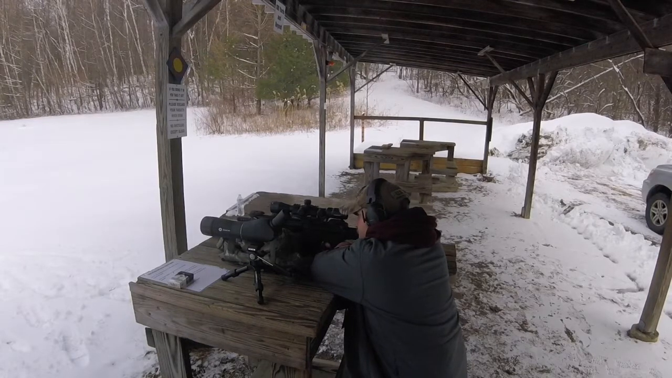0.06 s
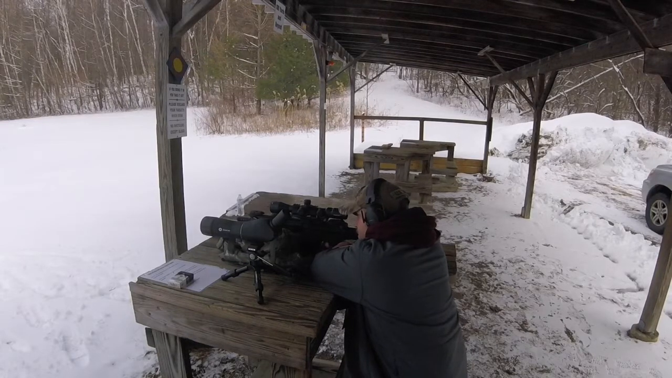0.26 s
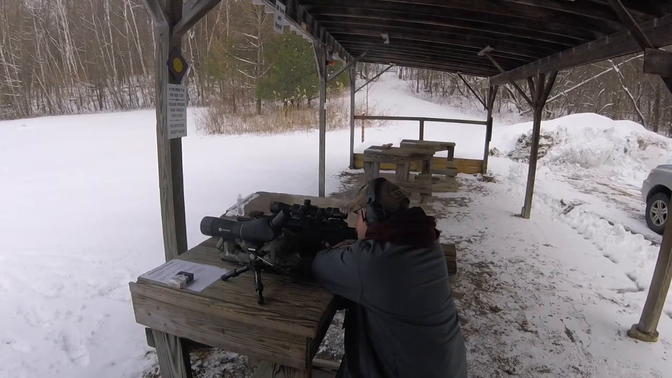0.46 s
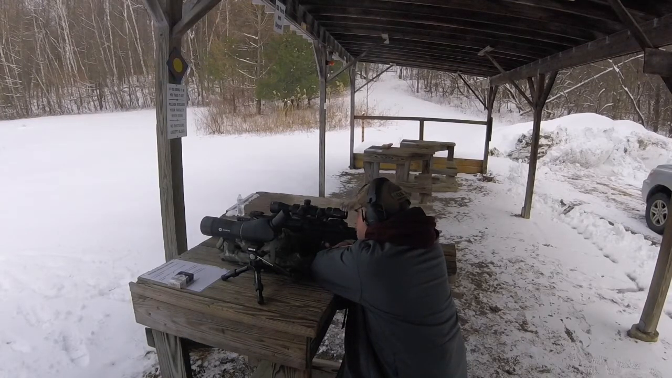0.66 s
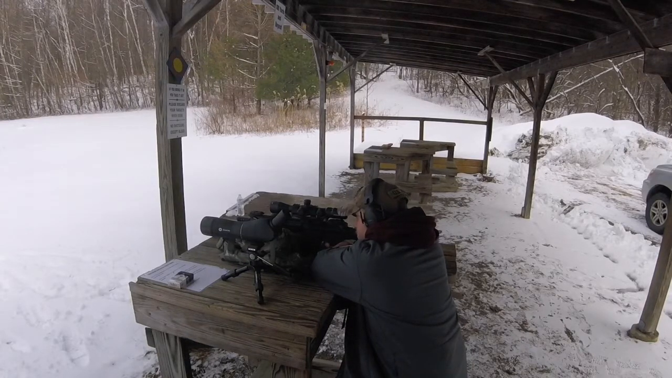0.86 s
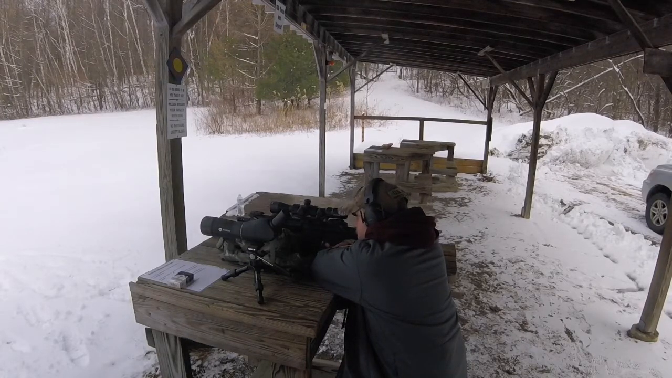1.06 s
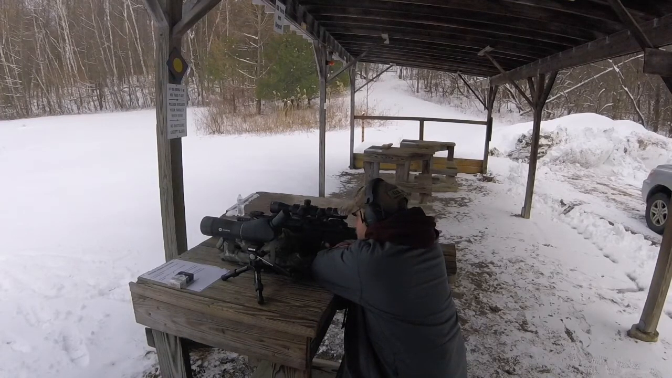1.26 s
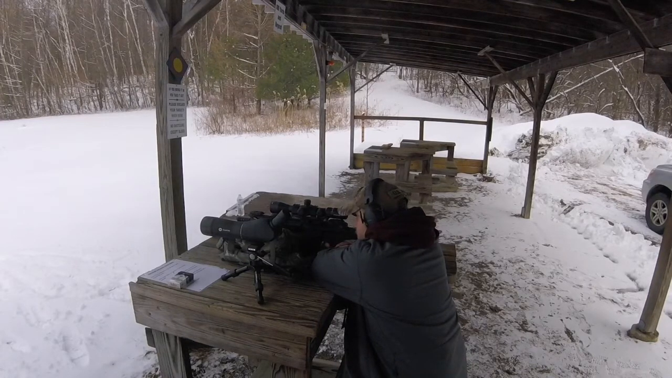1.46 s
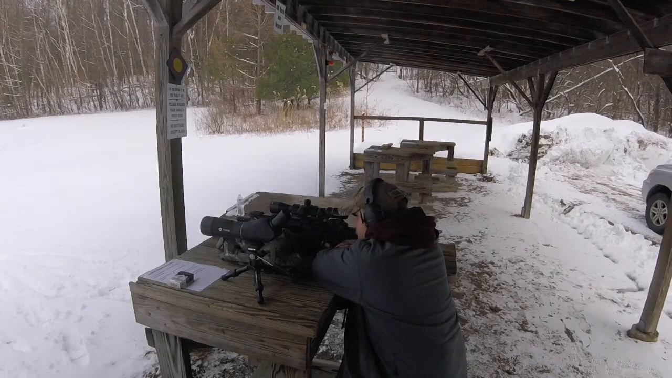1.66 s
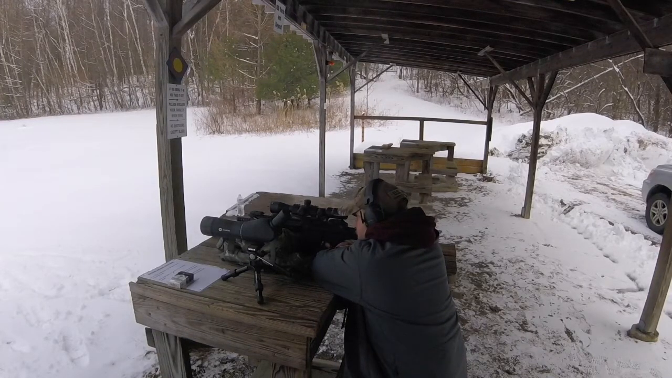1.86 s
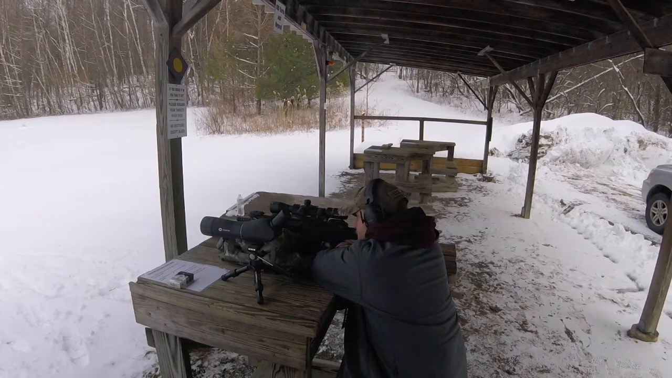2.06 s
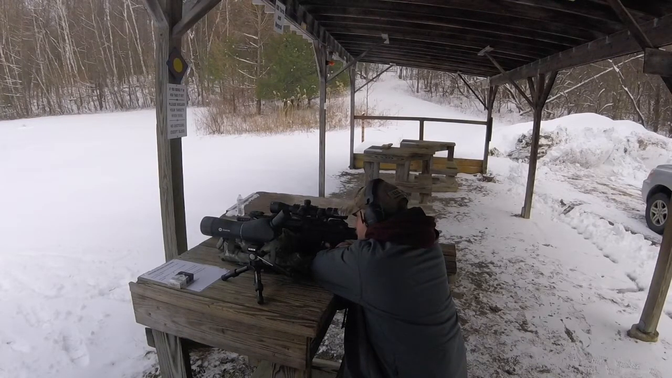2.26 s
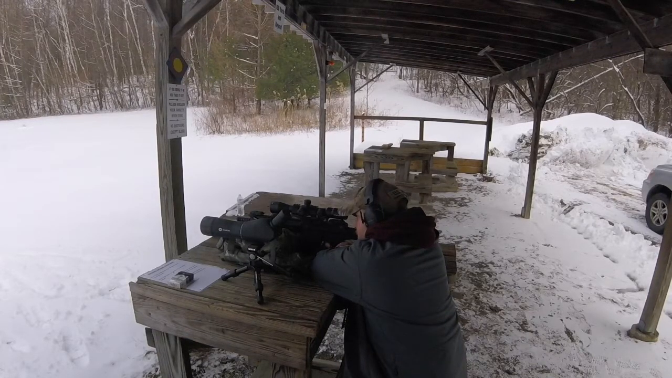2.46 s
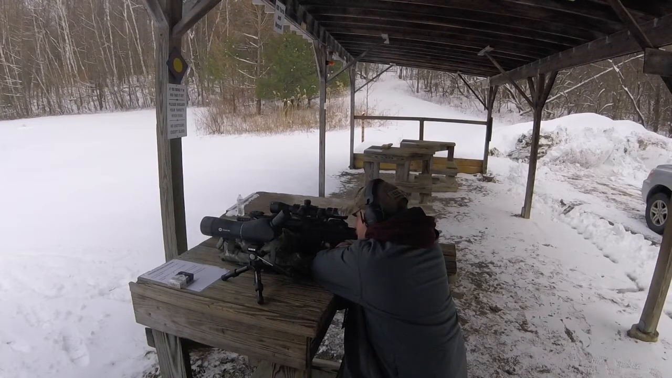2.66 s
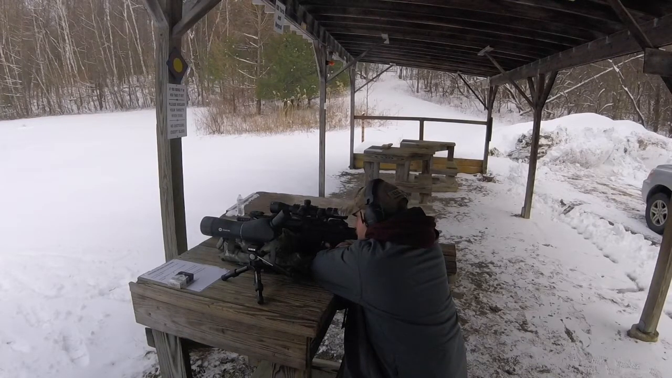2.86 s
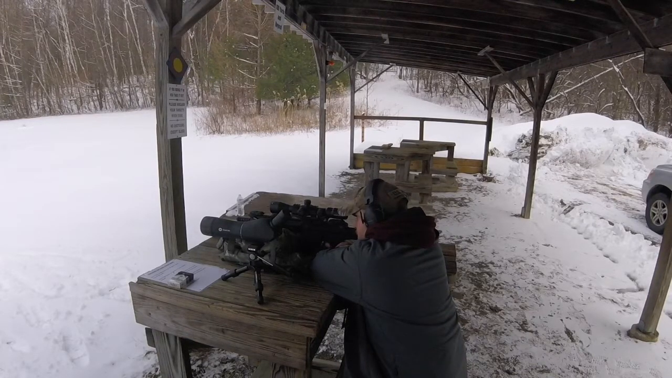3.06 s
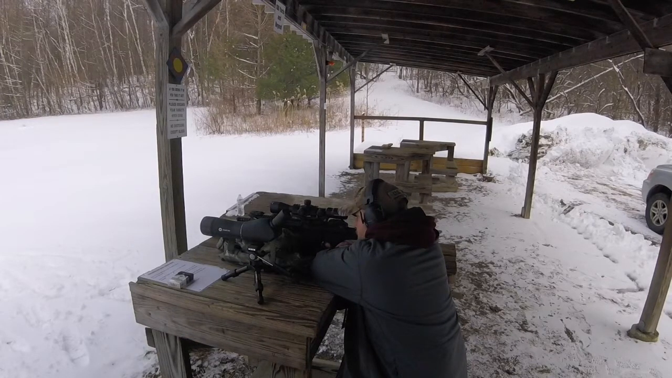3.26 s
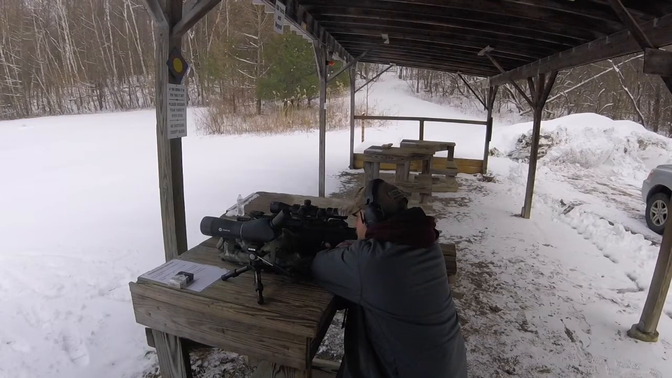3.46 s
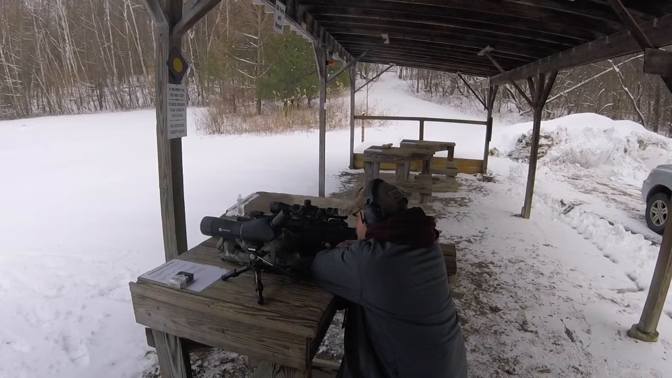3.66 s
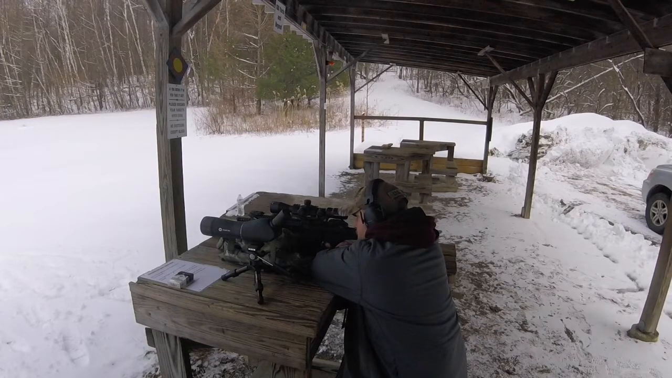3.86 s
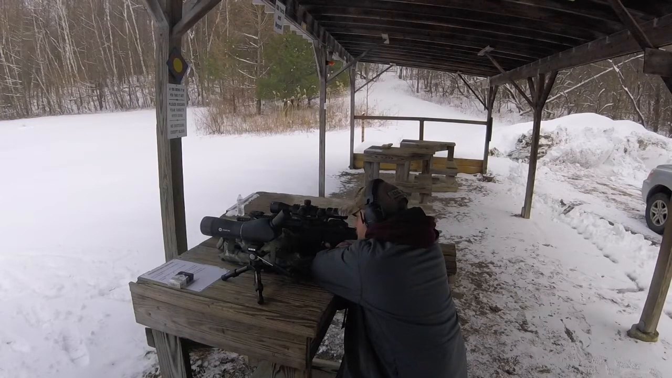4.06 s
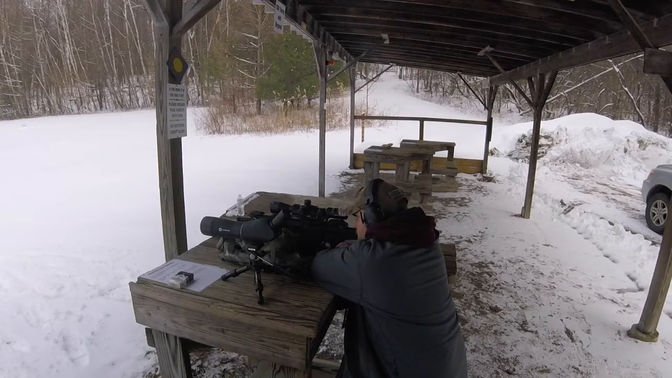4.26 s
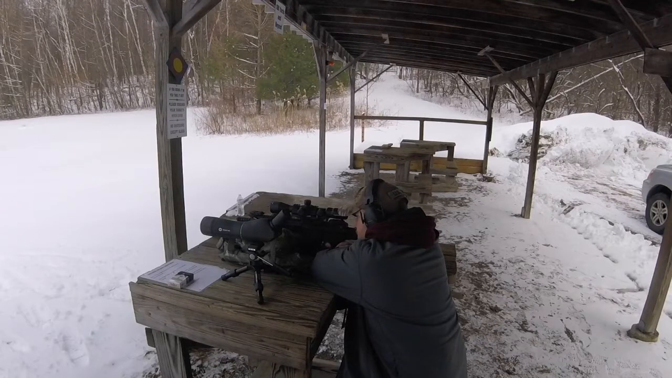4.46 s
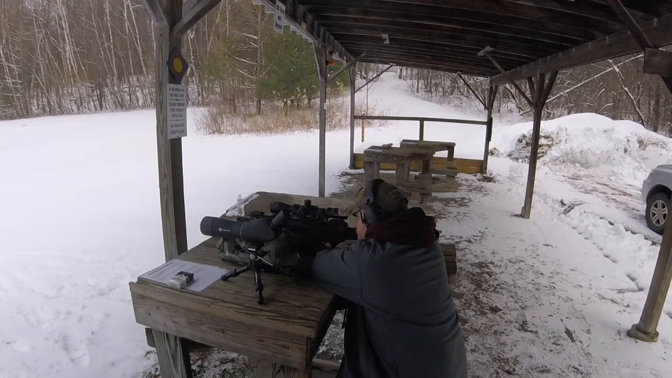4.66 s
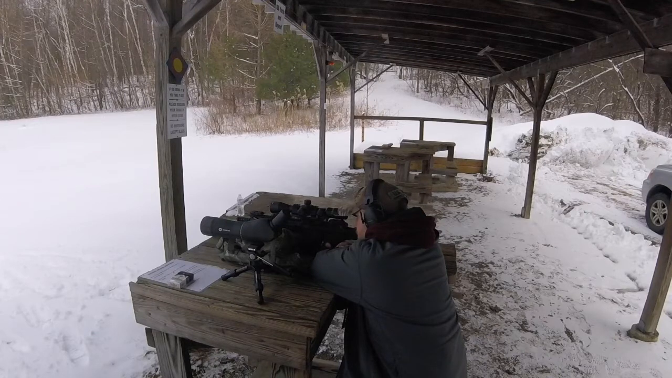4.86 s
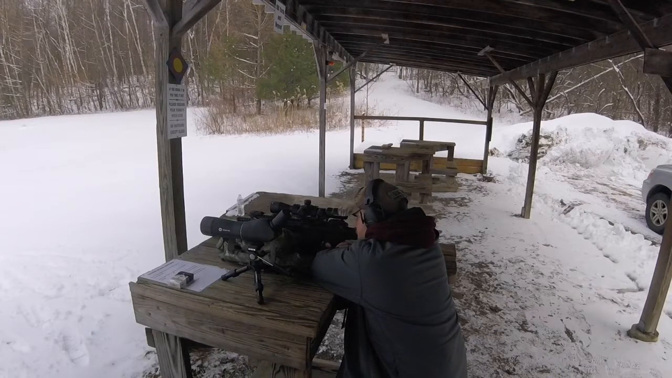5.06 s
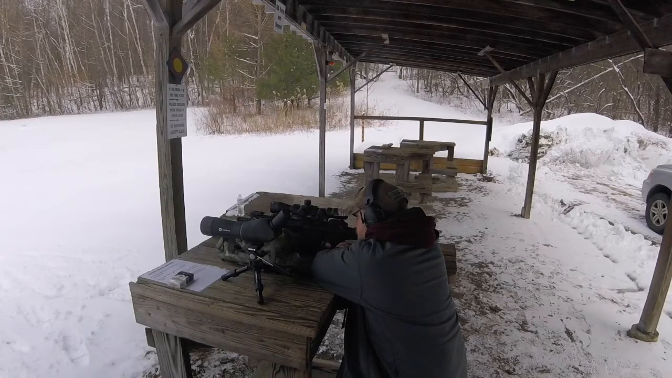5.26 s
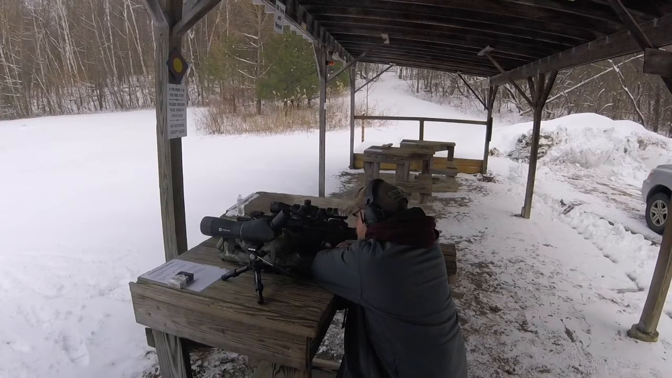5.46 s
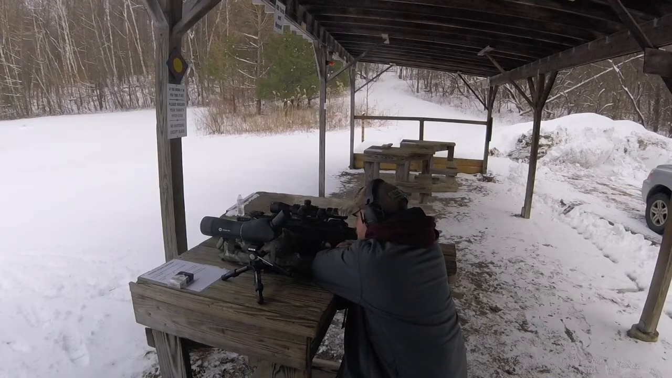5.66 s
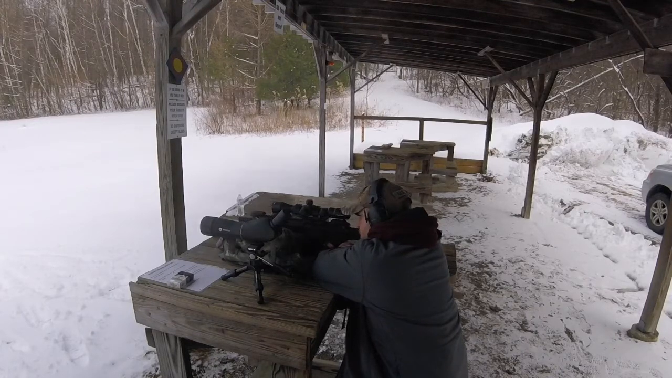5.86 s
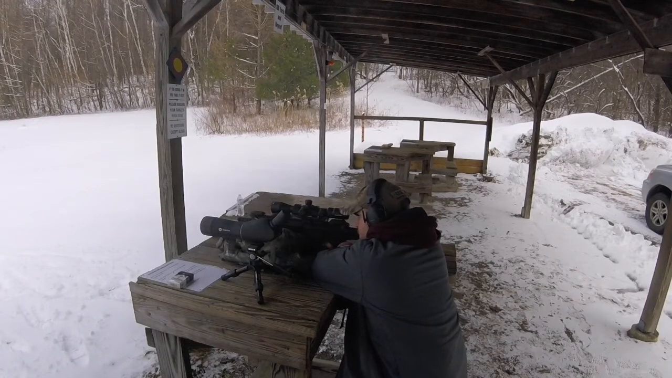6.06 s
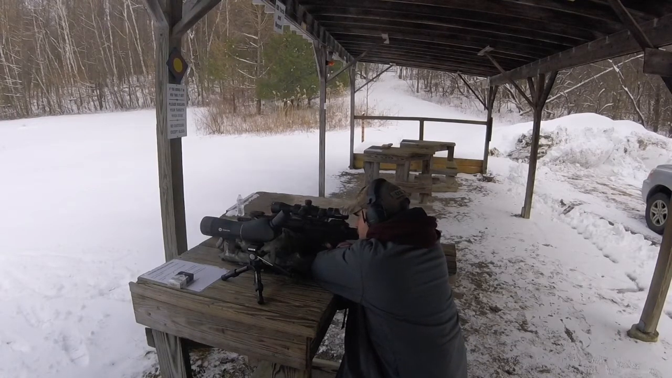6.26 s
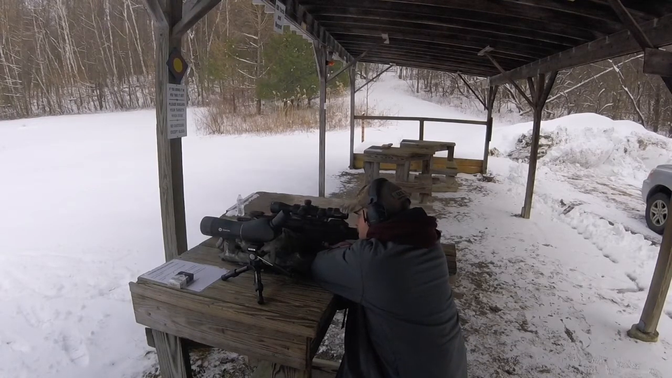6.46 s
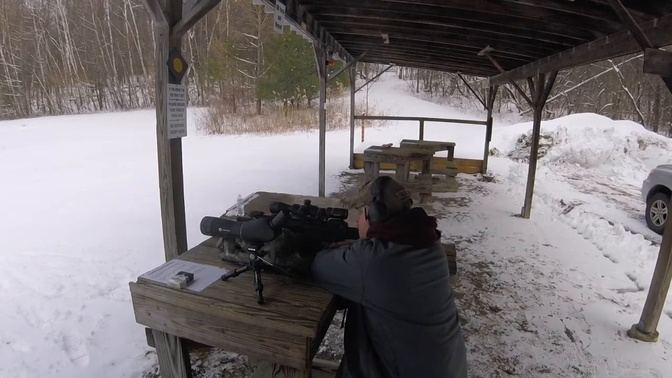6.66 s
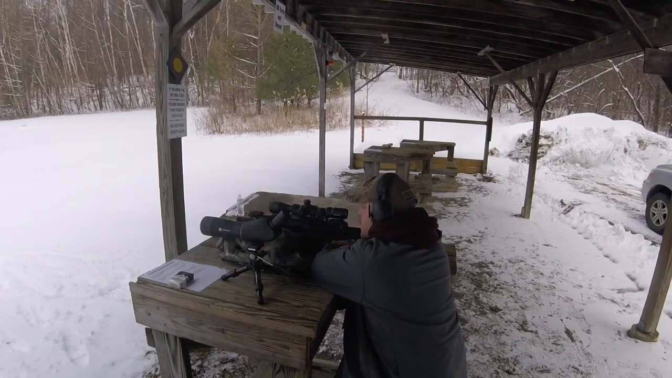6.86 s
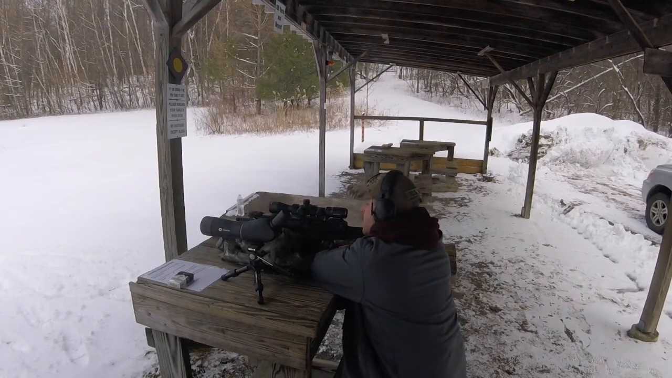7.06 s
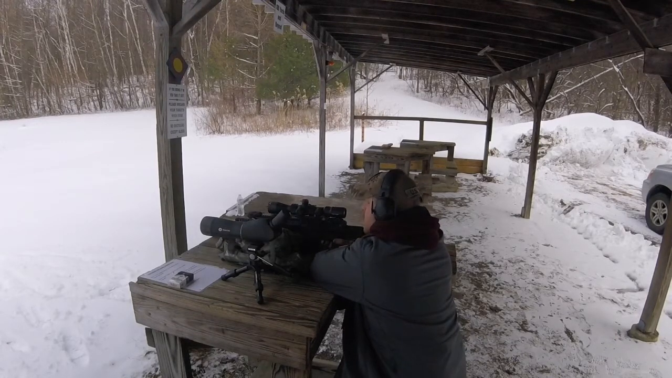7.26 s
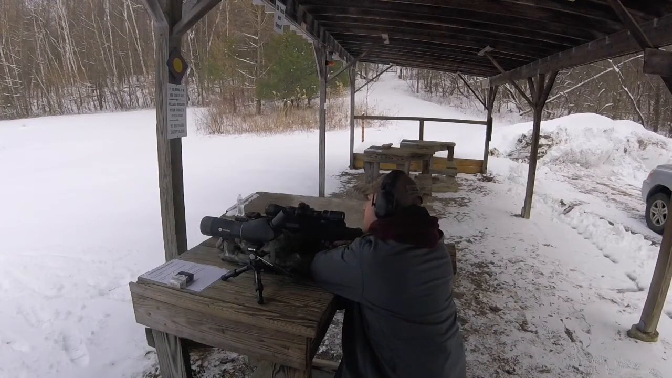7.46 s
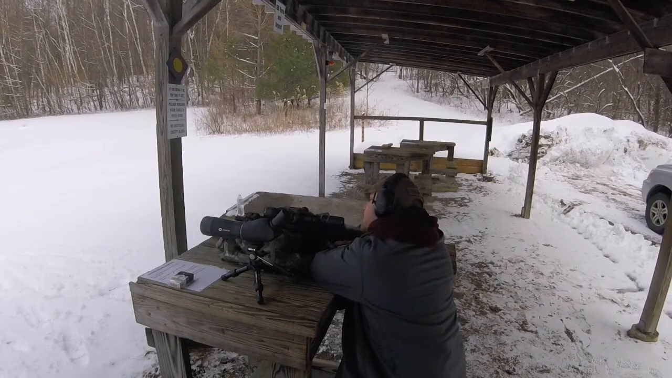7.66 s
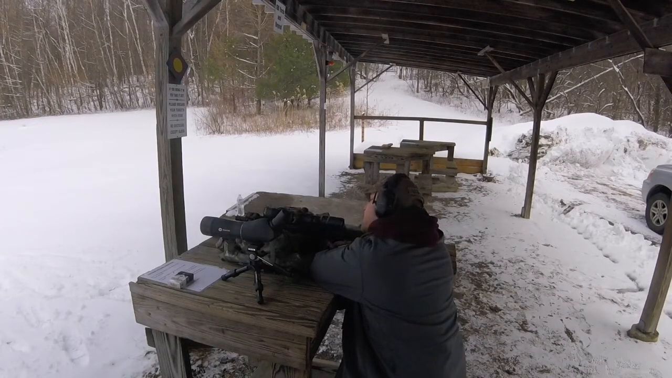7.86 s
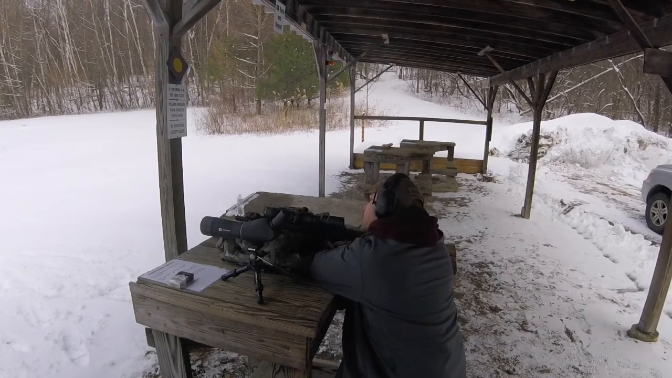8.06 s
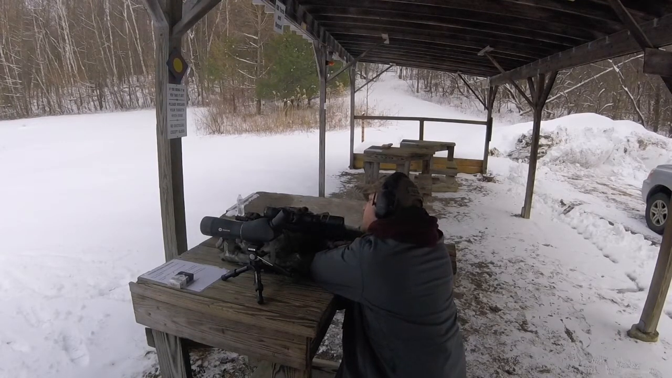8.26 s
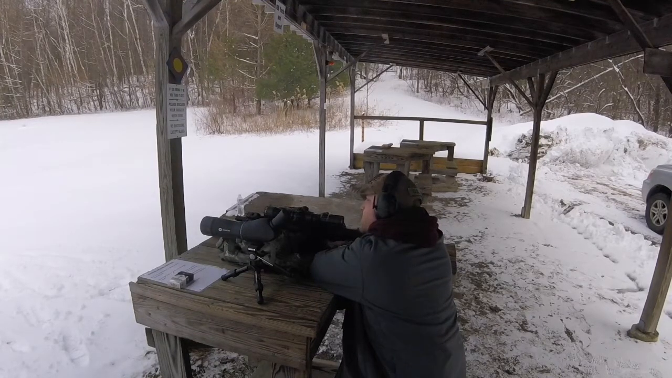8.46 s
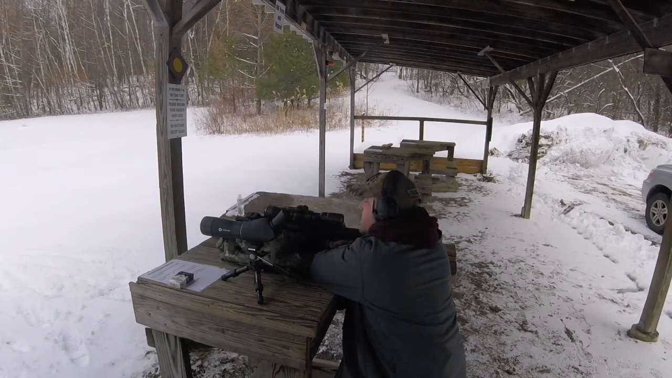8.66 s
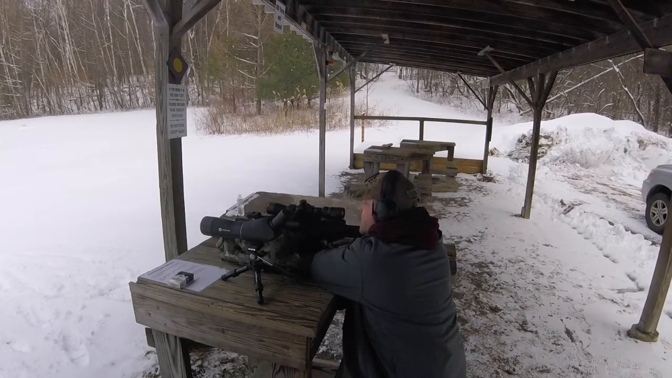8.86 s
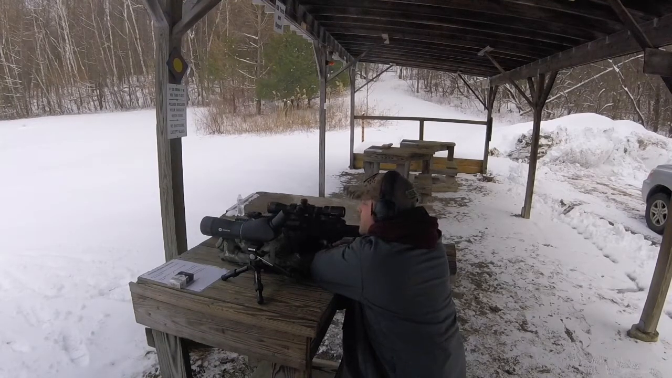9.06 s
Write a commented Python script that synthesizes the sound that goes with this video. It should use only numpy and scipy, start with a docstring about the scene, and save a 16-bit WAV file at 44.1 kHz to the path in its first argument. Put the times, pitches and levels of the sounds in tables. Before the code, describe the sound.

The sound opens on the tail of a gunshot, its echo rolling through wooded hills and fading over about three seconds. A small bullet smack comes at 0.2 seconds, and a brass case rings lightly at 0.4 and 0.7. Faint meltwater drips tick throughout over soft hiss, with a few brief jacket rustles. From about 2.6 seconds a faint distant motor hums, slowly sinking in pitch. At 5.7 seconds one very loud, close gunshot cracks and booms under a wooden roof, overloading the microphone so that everything dips in level and creeps back. The spent case knocks and bounces between 5.9 and 6.3 seconds, and the bullet smacks the target at about 6.1. The echo swells and rolls away through the trees, with a few sharper returns. From 8.6 to 9 seconds cloth rustles and the gun gives several quiet metallic clicks.

```python
"""A rifle-calibre pistol has just been fired under the wooden roof of a snowy range, close to a camera.
The bullet smacks the target, the echo rolls through wooded hills and a spent case knocks and rings.
Melt water drips, a jacket rustles and a distant motor hums, sinking in pitch. At 5.7 s a second blast
overloads the recorder, whose gain dives and creeps back while hit, case and echo follow again.
Near the end the gun clicks as it is handled."""
import sys
import numpy as np
from scipy import signal
from scipy.io import wavfile
from scipy.ndimage import uniform_filter1d, minimum_filter1d

SR = 44100
rng = np.random.default_rng(int(sys.argv[2]) if len(sys.argv) > 2 else 0)


def unload_wav(signal):
    """Save mono or channel-first audio to the path in sys.argv[1] as 16-bit WAV at rate SR, clipped to [-1, 1]."""
    wavfile.write(
        sys.argv[1],
        SR,
        np.round(np.clip(np.atleast_2d(signal).T, -1, 1) * 32767).astype(np.int16),
    )


N = 402191

# when the gun fires, first just before the scene opens: (time [s])
SHOT_TIMES = [-0.2847, 5.698]
def shots():
    """Gun and hills stay put, so both shots have the very same blast and echo."""
    report, out = woods(), np.zeros(N)
    add(report, 0, blast())
    for s in SHOT_TIMES:
        add(out, s, report)
    return out


# the blast and its bounces off bench, roof and posts:
# (delay [s], push level [dB], push length [s], crack level [dB])
BLAST_PATHS = [(0, 26.5, 0.0045, 24), (.0054, -4, 0.0003, 14), (.009, 17, 0.00097, 8),
               (0.014, 21.5, .002, 8), (0.0225, 16.5, 0.0027, -6)]
# tone of the shock wave's crack: (frequency [Hz], level [dB])
CRACK_TONE = [(300, -13), (1500, -7), (2800, 12), (4000, -14), (5800, 22), (7000, 12), (9500, -8),
              (13000, -12)]
# tone of the shelter's clatter: (frequency [Hz], level [dB])
CLATTER_TONE = [(30, 11), (90, 24), (170, 26), (300, 29.5), (500, 32), (720, 31), (1200, 26), (2200, 20.5),
                (3100, 18), (3900, 10.5), (5300, 18.5), (6600, 16.5), (9000, 2), (12000, 3)]
# the roof's short thud: (pitch [Hz], level [dB], time to fade 60 dB [s])
ROOF_THUD = [(174.5, 6, 0.13), (231, -6, 0.2)]
# the shelter's deep notes: (pitch [Hz], level [dB], time to fade 60 dB [s], rise time [s])
SHELTER_BOOM = [(105, 6.5, 0.84, 0.16), (114, 3, 0.69, 0.12)]
def blast(fast_fade_s=0.15, slow_fade_s=1.0, slow_db=-19, push_lag_s=.0009):
    """Shock waves crack, then push and suck; posts and rafters scatter them, and the shelter booms."""
    t = seconds(1.5)
    out = np.zeros(len(t))
    for delay, push_db, push_s, crack_db in BLAST_PATHS:
        add(out, delay, gain_of(crack_db) * colour(puff(decay_s=0.00037), CRACK_TONE))
        add(out, delay + push_lag_s, gain_of(push_db) * (1 - t / push_s) * np.exp(-t / push_s))

    def lingering_db(s, hz):
        rumble_db = bump(hz, centre_hz=135, half_width_hz=95, height_db=11)
        fade_db_per_s = 60 / slow_fade_s + 9 * hz / 1000  # high sounds die sooner
        return slow_db + rumble_db - s * fade_db_per_s
    fast = rng.standard_normal(len(t)) * gain_of(-60 * t / fast_fade_s)
    slow = noise(1.5, lingering_db, size=2048)
    out += colour(fast + slow, CLATTER_TONE)
    for hz, db, fade_s in ROOF_THUD:
        out += fading_note(t, hz, db, fade_s)
    for hz, db, fade_s, rise_s in SHELTER_BOOM:
        out += fading_note(t, hz, db, fade_s) * (1 - np.exp(-t / rise_s))
    return out


# tone of what the trunks throw back over the snow: (frequency [Hz], level [dB])
WOODS_TONE = [(40, -26), (170, -37.5), (240, -19.5), (340, -5.5), (480, 1), (640, 2), (1000, -4),
              (1500, -3.5), (2300, -5), (3100, -8.5), (3900, -15.5), (5500, -1.5), (6600, -12.5),
              (11000, -21.5)]
# single sharp echoes from the slopes: (delay [s], spike above the rolling echo [dB])
SLOPE_ECHOES = [(1.024, 23.5), (1.206, 26.5), (2.199, 20.5), (3.178, 30)]
def woods(air_db_per_s=5, carry_db_per_s=3, carry_hz=345):
    """Countless trunks return the shot; the longer the path, the more treble the air has taken."""
    def level_db(t, hz):
        air_loss_db = air_db_per_s * t * (hz / 1000) ** 1.126
        # low sounds bend round the hills and carry farther
        carry_db = carry_db_per_s * np.minimum(t, 3) / (1 + (hz / carry_hz) ** 4)
        return roll_db(t) + read(WOODS_TONE, hz) - air_loss_db + carry_db
    echo = noise(6.5, level_db, size=1024, spikes=SLOPE_ECHOES)
    t = np.arange(len(echo)) / SR
    small_clumps_db = 0.78 * wander(t, per_s=90)
    large_groves_db = 0.98 * wander(t, per_s=15)
    return echo * gain_of(small_clumps_db + large_groves_db)


# swells sent back by wooded hillsides: (delay [s], half width [s], boost [dB])
HILL_SWELLS = [(.56, .05, 3), (1.33, 0.15, 4), (1.73, 0.23, 2.5), (3.1, 0.25, 3.5), (3.53, 0.17, 4)]
def roll_db(t, field_db=-23, field_s=0.079, trees_db=4.5, trees_s=0.32, fade_db_per_s=8):
    """The echo is faint over open snow, grows as the tree line answers, then fades with a few swells."""
    short_of_trees = np.clip((trees_s - t) / (trees_s - field_s), 0, 1)
    rise_db = (field_db - trees_db) * short_of_trees ** 1.34
    fade_db = fade_db_per_s * np.maximum(t - trees_s, 0)
    hills_db = sum(db * np.exp(-((t - delay) / width) ** 2) for delay, width, db in HILL_SWELLS)
    return trees_db + rise_db - fade_db + hills_db


# bullets reaching the target: (time [s], level [dB])
BULLET_HITS = [(0.164, -22), (6.145, -20)]
# tone of a wet smack, also used for the drips: (frequency [Hz], level [dB])
SMACK_TONE = [(300, -9), (1500, 14), (2500, 19), (5000, 14.5), (6800, 8.5), (8500, -14), (12000, -25)]
def bullet_hits():
    """Each bullet stops in the target with a short smack."""
    out = np.zeros(N)
    for s, db in BULLET_HITS:
        add(out, s, gain_of(db) * evened(colour(puff(decay_s=0.011), SMACK_TONE)))
    return out


# spent cases landing, before overall_db is added:
# (time [s], knock level [dB], knock pitch [Hz], ring level [dB])
CASE_LANDINGS = [(.372, -42, 6370, -50), (.405, -54, 8300, -32.5), (.675, -47, 8750, -39),
                 (5.88, -23, 5270, -60), (6.048, -19.5, 5800, -49), (6.324, -35, 8700, -38)]
# the notes of a brass case: (pitch [Hz], relative level [dB], time to fade 60 dB [s])
CASE_NOTES = [(8400, -1, 0.22), (8250, -7, .15), (12450, -38, .15)]
def cases(overall_db=-8):
    """Brass cases knock on bench and ground and ring briefly."""
    out, t = np.zeros(N), seconds(.4)
    ring = sum(fading_note(t, hz, db, fade_s) for hz, db, fade_s in CASE_NOTES)
    for s, knock_db, hz, ring_db in CASE_LANDINGS:
        add(out, s, gain_of(knock_db) * tick(hz, width_hz=1700, decay_s=0.0016))
        add(out, s, gain_of(ring_db) * ring)
    return gain_of(overall_db) * out


# clicks of the gun: (time [s], level [dB], decay [s], ring compared with clack [dB])
GUN_CLICKS = [(8.681, -55, .004, -6), (8.691, -50.5, 0.0015, -15), (8.7103, -40, 0.0023, -2.5),
              (8.726, -50, .004, -10), (8.751, -61, .004, 9), (8.869, -50.5, 0.0019, -3),
              (8.878, -60, .003, -12), (8.997, -48.5, 0.0023, -1)]
# tone of the gun's body: (frequency [Hz], level [dB])
CLACK_TONE = [(300, -24), (900, 2), (1600, -0.5), (3200, -1), (5000, -10), (7500, -7), (12000, -18)]
def gun_handling(ring_hz=5800):
    """The gun's body clacks dryly, with a short bright ring of steel."""
    out = np.zeros(N)
    for s, db, decay_s, ring_db in GUN_CLICKS:
        clack = evened(colour(puff(decay_s), CLACK_TONE))
        ring = gain_of(ring_db) * tick(ring_hz, width_hz=940, decay_s=decay_s)
        add(out, s, gain_of(db) * (clack + ring))
    return out


# the nearest drops: (time [s], level [dB], pitch [Hz], slap compared with tick [dB])
NEAR_DRIPS = [(1.172, -51, 6550, -18), (1.638, -53, 5460, -20), (1.675, -48.5, 5250, -26),
              (2.118, -55, 6290, -20), (2.2355, -48, 5700, -29), (2.369, -52.5, 6100, -5),
              (2.411, -52, 5650, -22), (2.509, -50.5, 6040, -13), (2.751, -51, 5670, -3.5),
              (2.865, -52, 6550, -16), (3.179, -48, 5840, -11), (3.41, -52.5, 5950, -6.5),
              (3.908, -56, 6340, -22), (4.32, -55, 6000, -7), (4.36, -52, 6340, -6),
              (4.509, -52.5, 6240, -9), (4.636, -48.5, 5470, -15), (4.789, -51, 6030, -7),
              (4.894, -53, 5800, 2.5), (5.349, -56, 6260, -13), (5.583, -51, 6400, -11),
              (5.603, -46, 5930, -15), (6.823, -50.5, 6240, -20), (7.011, -51.5, 5600, -20),
              (7.422, -54, 5200, -23), (7.6, -49, 6160, -10), (7.852, -52, 5650, -3.5),
              (7.887, -49, 6100, -16), (8.106, -59.5, 7110, 4.5), (8.342, -53, 5500, -10),
              (8.401, -47.5, 6260, -23)]
def drips(far_per_s=7, far_db=-60.5, spread_db=7, far_hz=5970, spread_hz=2400):
    """Melt water falls from the roof's edge: some drops close by, fainter ones at random farther off."""
    out = np.zeros(N)
    for s, db, hz, slap_db in NEAR_DRIPS:
        add(out, s, gain_of(db) * drip(hz, slap_db))
    for k, (when, distance, pitch) in enumerate(rng.random(size=(200, 3))):
        s = (k + 2 * when) / far_per_s
        if s < N / SR:
            far_drop = drip(far_hz + spread_hz * (pitch - .5), slap_db=-13)
            add(out, s, gain_of(far_db - spread_db * distance) * far_drop)
    return out


def drip(hz, slap_db, spatter_db=-7, droplets_per_s=500):
    """One drop lands with a bright tick, a duller slap and a spatter of droplets."""
    slap = evened(colour(puff(decay_s=0.0004), SMACK_TONE))
    spray = puff(decay_s=0.015)
    droplets = spray * (rng.random(len(spray)) < droplets_per_s / SR)
    spatter = gain_of(spatter_db) * evened(colour(droplets, SMACK_TONE))
    return tick(hz, width_hz=2000, decay_s=0.0024) + gain_of(slap_db) * (slap + spatter)


# the shooter's jacket moving: (time [s], length [s], level [dB])
RUSTLES = [(2.299, 0.1, -50), (2.743, 0.063, -48), (5.289, 0.078, -48.5), (7.409, 0.2, -46),
           (7.8, 0.082, -56), (8.285, 0.11, -56), (8.64, 0.34, -48.5)]
# tone of the cloth: (frequency [Hz], level [dB])
CLOTH_TONE = [(500, -17), (2500, -4), (3900, -11), (5300, -2.5), (6600, 0), (9000, -17), (12000, -17)]
def jacket(creases_per_s=1800):
    """Stiff cloth gives way in a swell of tiny creases."""
    out = np.zeros(N)
    for s, length, db in RUSTLES:
        size, chance = rng.standard_normal(SR // 2), rng.random(SR // 2)
        creases = (size * (chance < creases_per_s / SR))[:int(length * SR)]
        add(out, s, gain_of(db) * evened(colour(creases, CLOTH_TONE)) * np.hanning(len(creases)))
    return out


# quick bounces off the roof: (delay [s], strength [share of the direct sound])
ROOF_BOUNCES = [(.0062, 0.51), (.0078, 0.065), (.0098, 0.28), (0.0112, .18), (0.016, 0.086)]
def shelter_echo(x, fade_s=0.21, tail_db=-5):
    """Small sounds come back from the roof, then die away among the benches."""
    t = seconds(.3)
    after_first_bounce = t > ROOF_BOUNCES[0][0]
    tail = rng.standard_normal(len(t)) * gain_of(-60 * t / fade_s) * after_first_bounce
    response = gain_of(tail_db) * tail / np.linalg.norm(tail)
    response[0] = 1  # the direct sound
    for delay, strength in ROOF_BOUNCES:
        response[round(delay * SR)] += strength
    return signal.oaconvolve(x, response)[:N]


# the course of the motor's hum: (time [s], pitch [Hz], level [dB])
MOTOR_HUM = [(2.6, 293.6, -56), (3.5, 275.4, -55.5), (4.2, 265, -52), (4.6, 256.3, -50.5), (5, 250.4, -51),
             (5.599, 234, -49), (6.5, 222, -71)]
def motor(waver=0.0036):
    """A distant motor hums one wavering note that slowly sinks."""
    s, hz, db = np.transpose(MOTOR_HUM)
    t = np.arange(N) / SR
    drift = evened(uniform_filter1d(rng.standard_normal(N), size=3000))
    cycles = np.cumsum(np.interp(t, s, hz) * (1 + waver * drift)) / SR
    loudness = gain_of(np.interp(t, s, db, left=-120, right=-120))
    return loudness * np.sqrt(2) * np.sin(2 * np.pi * cycles)


# tone of still air and microphone hiss: (frequency [Hz], level [dB])
HISS_TONE = [(20, -24), (110, -26), (170, -30.5), (340, -33.5), (700, -38), (1500, -41), (3000, -46.5),
             (4400, -55), (5500, -48.5), (8000, -44.5), (9600, -49.5), (10600, -55.5), (12000, -51.5),
             (13200, -58)]
def background(top_hz=13300):
    """Air rumbles and the microphone hisses; its small opening rings at one high pitch."""
    def level_db(t, hz):
        opening_db = bump(hz, centre_hz=6520, half_width_hz=240, height_db=11.5)
        return read(HISS_TONE, hz) + opening_db - .025 * np.maximum(hz - top_hz, 0)
    return noise(N / SR + 1, level_db, size=2048)[:N]


def camera_housing(x, cutoff_hz=9700):
    """The camera's housing shuts out the highest sounds."""
    return signal.sosfilt(signal.butter(9, cutoff_hz, fs=SR, output="sos"), x)


def gain_of(db):
    """Turns decibels into a number to multiply by."""
    return 10 ** (np.asarray(db) / 20)


def evened(x):
    """Scales a sound to an average power of 1."""
    return x / np.sqrt(np.mean(x ** 2) + 1e-20)


def read(tone, hz):
    """Looks up a tone table's level, gliding between its rows."""
    row_hz, db = np.transpose(tone)
    return np.interp(np.log(hz + 1), np.log(row_hz), db)


def bump(hz, centre_hz, half_width_hz, height_db):
    """A rounded boost around one frequency."""
    return height_db / (1 + ((hz - centre_hz) / half_width_hz) ** 2)


def add(mix, s, sound):
    """Mixes a sound in at time s, which may lie before the start."""
    at = round(s * SR)
    sound = sound[max(-at, 0):]
    part = mix[max(at, 0):][:len(sound)]
    part += sound[:len(part)]


def seconds(length):
    """The time of each sample."""
    return np.arange(int(length * SR)) / SR


def fading_note(t, hz, db, fade_s):
    """A pure note that drops 60 dB in fade_s seconds."""
    return gain_of(db - 60 * t / fade_s) * np.sin(2 * np.pi * hz * t)


def noise(length, level_db, size, spikes=()):
    """Noise, with any spikes (time [s], level [dB]), shaped by the rule level_db(time, frequency)."""
    white = rng.standard_normal(int(length * SR))
    for s, db in spikes:
        white[round(s * SR)] += gain_of(db)
    frames = dict(fs=SR, nperseg=size, noverlap=size * 3 // 4)
    hz, t, spectrum = signal.stft(white, **frames)
    shaped = spectrum * gain_of(level_db(t[None], hz[:, None]))
    return signal.istft(shaped, **frames)[1][:len(white)]


def colour(x, tone, size=2048):
    """Gives a sound the tone in a table, with a filter that never rings ahead of the sound."""
    log_gain = np.log(gain_of(read(tone, abs(np.fft.fftfreq(size, 1 / SR)))))
    taps = np.fft.ifft(np.exp(np.conj(signal.hilbert(log_gain)))).real
    return signal.fftconvolve(x, taps)[:len(x)]


def puff(decay_s):
    """A short puff of noise."""
    t = seconds(.1)
    return rng.standard_normal(len(t)) * np.exp(-t / decay_s)


def tick(hz, width_hz, decay_s):
    """A puff filtered twice so that it rings around one pitch."""
    radius, angle = np.exp(-np.pi * width_hz / SR), 2 * np.pi * hz / SR
    ringing = [1, 0, -1], [1, -2 * radius * np.cos(angle), radius ** 2]
    once = signal.lfilter(*ringing, puff(decay_s))
    return evened(signal.lfilter(*ringing, once))


def wander(t, per_s):
    """A random line that takes a new course per_s times a second."""
    corners = rng.standard_normal(2000)
    return np.interp(t * per_s, np.arange(len(corners)), corners)


def scene():
    """Everything that reaches the microphone, in one channel."""
    gunfire = shots() + bullet_hits()
    small_sounds = shelter_echo(drips() + cases() + gun_handling() + jacket())
    return (camera_housing(gunfire + small_sounds + motor()) + background())[None]


def record(dry, lowest_gain=0.14, recovery_per_s=0.23, start_gain=0.2, look_ahead=1700, top_hz=16000):
    """The recorder turns down just ahead of a blast and creeps back; what is still too loud is clipped."""
    coming_peak = -minimum_filter1d(-abs(dry[0]), look_ahead, origin=-(look_ahead // 2))
    wanted = np.clip(1 / (coming_peak + 1e-9), lowest_gain, 1)
    wanted[0] = start_gain  # still low from the first shot
    climb = recovery_per_s * np.arange(N) / SR
    gain = np.minimum.accumulate(wanted - climb) + climb  # falls at once, rises slowly
    clipped = np.clip(dry * uniform_filter1d(gain, size=100), -1, 1)
    treble_cut = signal.firwin(255, top_hz, window=("kaiser", 8), fs=SR)
    return signal.oaconvolve(clipped, treble_cut[None], "same")


dry = scene()
out = record(dry)
unload_wav(out)
```